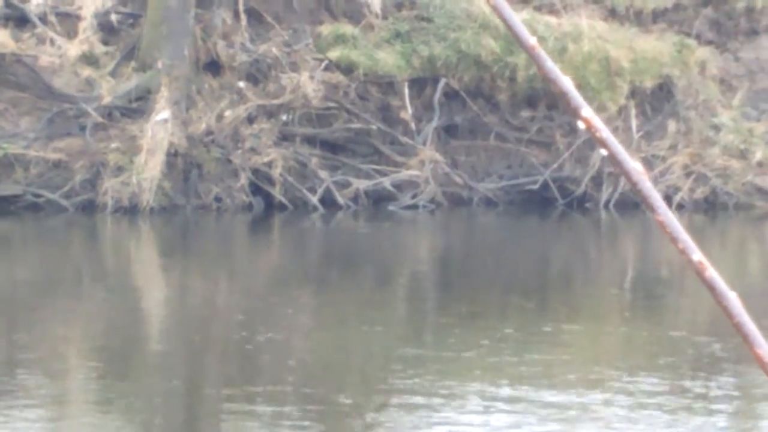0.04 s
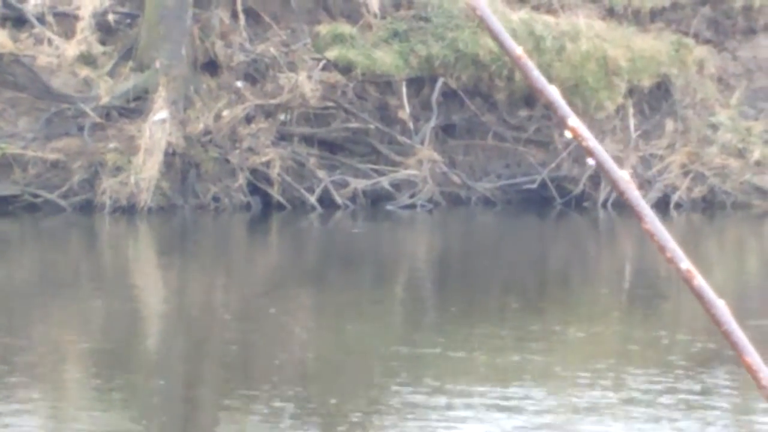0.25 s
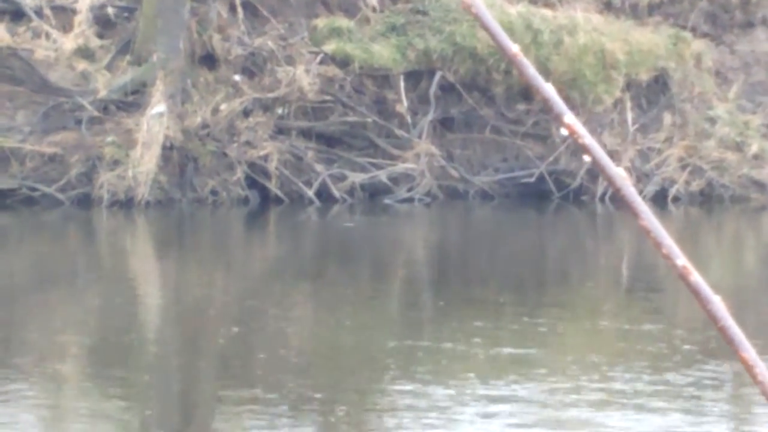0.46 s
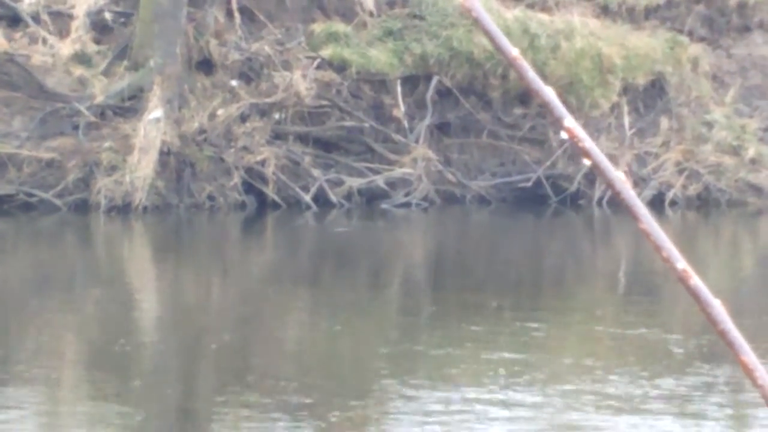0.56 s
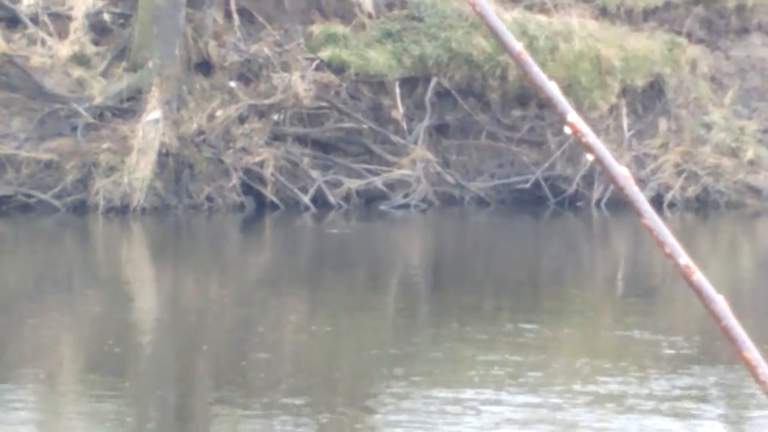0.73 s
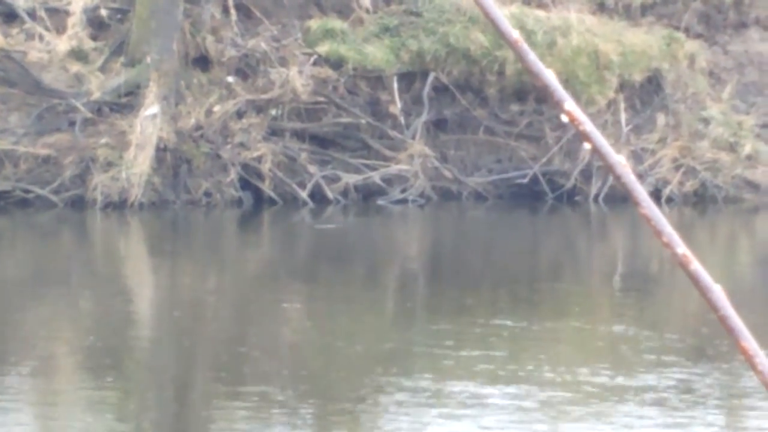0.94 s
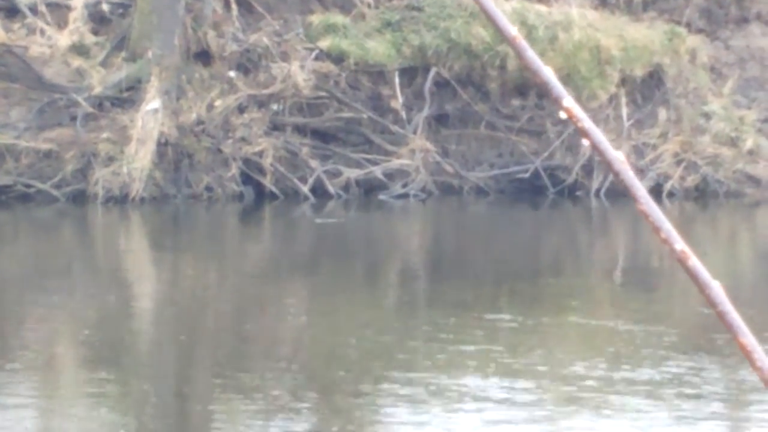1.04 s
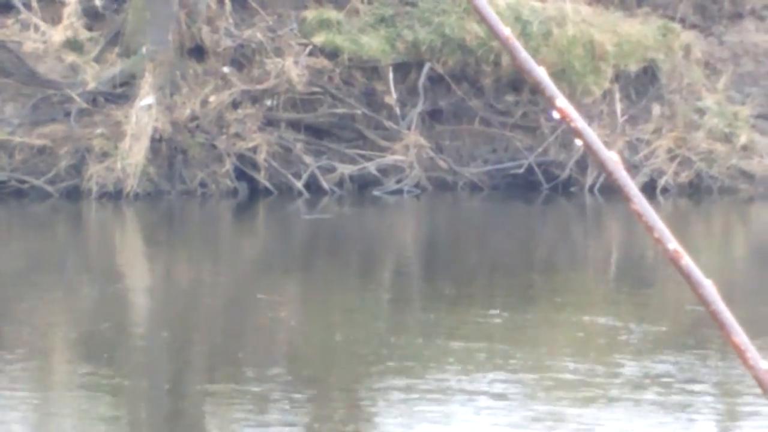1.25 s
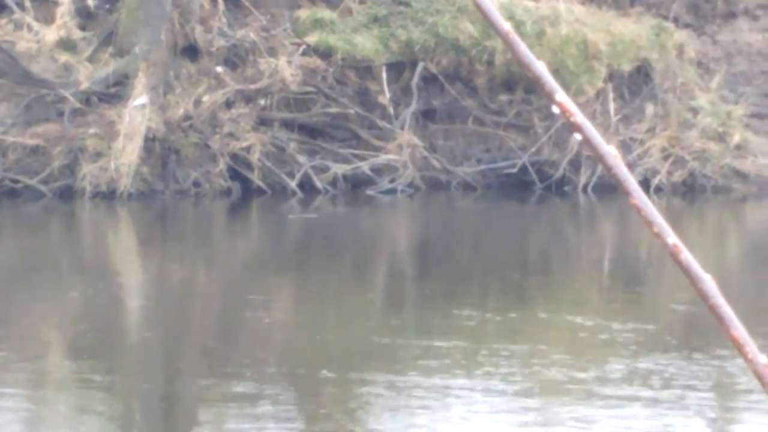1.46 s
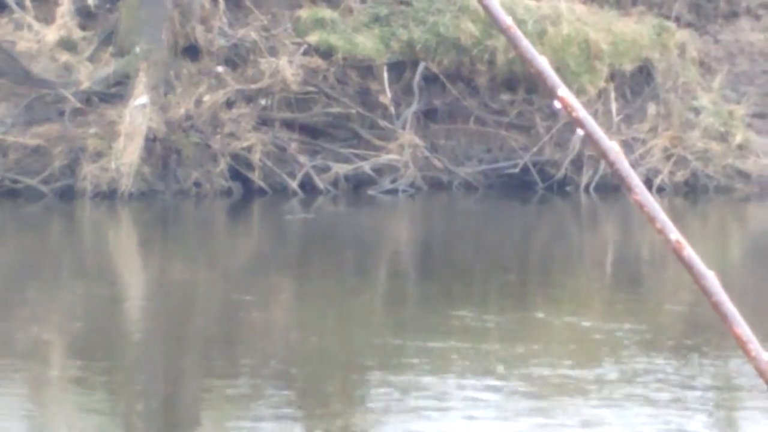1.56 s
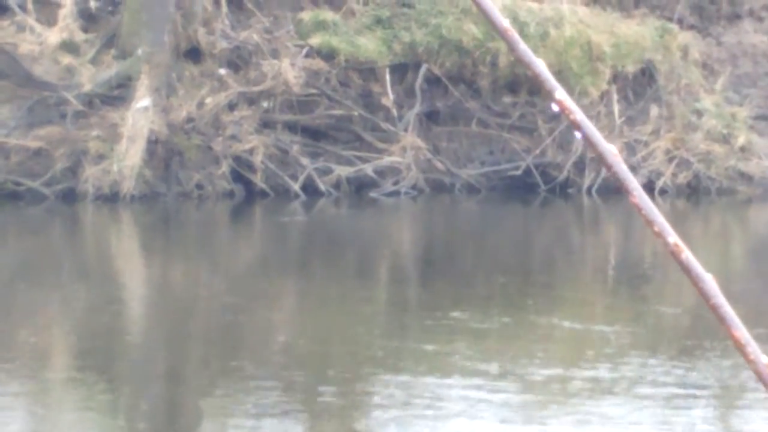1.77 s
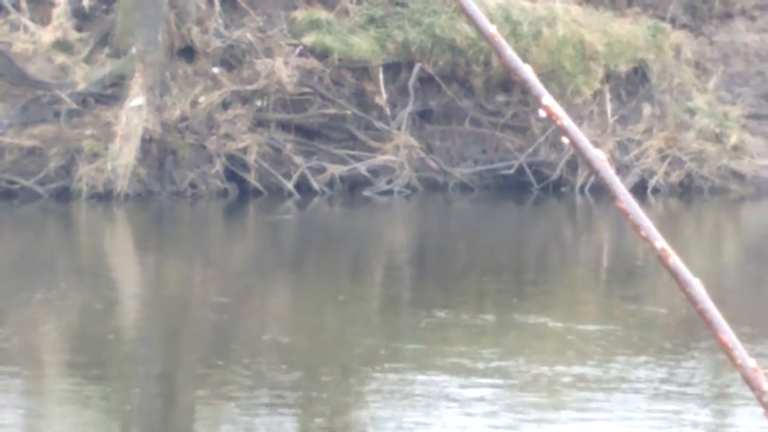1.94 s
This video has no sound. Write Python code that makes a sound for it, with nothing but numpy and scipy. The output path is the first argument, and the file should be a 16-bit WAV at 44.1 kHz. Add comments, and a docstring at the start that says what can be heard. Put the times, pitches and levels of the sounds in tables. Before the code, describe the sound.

Low wind gusts buffet the microphone, with faint high bird chirps over softly washing water.

```python
"""Small birds call across a calm river: five quick falling chirps, a few slurs, and thin high notes
from farther off, each a pure gliding whistle that scatters faintly off the bank and trees.
A few dry ticks sound close by, and gusts buffet the microphone with a low rumble.
Under it all lie a soft, steady wash of water and open air, and the recorder's hiss."""
import sys
import numpy as np
from scipy import signal
from scipy.fft import rfft, irfft
from scipy.io import wavfile
from scipy.ndimage import uniform_filter1d

SR = 44100
rng = np.random.default_rng(int(sys.argv[2]) if len(sys.argv) > 2 else 0)


def file_out(sig):
    """Save sig as 16-bit WAV at sys.argv[1]."""
    # one column per channel
    cols = np.atleast_2d(sig).T
    # limit, then scale
    lim = np.clip(cols, -1, 1)
    pcm = np.round(lim * 32767).astype(np.int16)
    wavfile.write(sys.argv[1], SR, pcm)


N = 88200
T = np.arange(N) / SR
BIN_HZ = np.maximum(np.arange(N // 2 + 1) * SR / N, 1)


def amp(db):
    return 10 ** (np.asarray(db) / 20)


def unit(x):
    return x / np.sqrt(np.mean(x ** 2))


def noise(spectrum):
    """Noise of rms 1, coloured by a curve of (Hz, dB) points."""
    hz, db = np.array(spectrum).T
    gain = amp(np.interp(np.log(BIN_HZ), np.log(hz), db))
    return unit(irfft(rfft(rng.standard_normal(N)) * gain, N))


def band(hz, width_hz):
    """Noise of rms 1 in one steep-sided resonance."""
    detuning = (BIN_HZ ** 2 - hz ** 2) / (BIN_HZ * width_hz)
    return unit(irfft(rfft(rng.standard_normal(N)) / (1 + 1j * detuning) ** 2, N))


def wander(rate_hz):
    """Smooth random drift of rms 1."""
    size = max(int(SR / rate_hz), 2)
    return unit(uniform_filter1d(uniform_filter1d(rng.standard_normal(N), size), size))


# The colour of the river bed. Each row: frequency in Hz, relative level in dB.
RIVER_SPECTRUM = [(30, 4), (150, 0), (300, 2), (500, 0.5), (850, 1), (1200, -3), (1700, -8.5), (2500, -16),
                  (4000, -22), (9000, -52)]

def river():
    """A soft wash of water and open air, with a faint far hum."""
    wash = amp(-59 + .25 * wander(4.4)) * noise(RIVER_SPECTRUM)
    hum = amp(-73.5) * band(hz=471.1, width_hz=16)
    return wash + hum


def turbulence(spectrum, steady_s=.036):
    """Coloured noise held at an even strength, its chance swells ironed out."""
    air = noise(spectrum)
    power = uniform_filter1d(np.abs(signal.hilbert(air)) ** 2, int(steady_s * SR))
    return unit(air / np.sqrt(power))


# The rise and fall of the gusts. Each row: time in seconds, level in dB.
GUST_LEVELS = [(0, -33.5), (.14, -53), (0.219, -36), (0.292, -39), (.35, -49.5), (0.399, -41), (.49, -43),
               (0.599, -46.5), (.73, -35), (.82, -41.5), (0.872, -31), (.96, -25), (1.06, -40), (1.12, -37),
               (1.18, -51.5), (1.288, -36.5), (1.42, -46), (1.54, -39.5), (1.61, -56), (1.74, -47),
               (1.85, -55), (2.0, -51)]
# The colour of their rumble. Each row: frequency in Hz, relative level in dB.
RUMBLE_SPECTRUM = [(20, -26), (32, -20), (46, 7), (65, 7.5), (90, 2), (130, -6), (200, -19.5), (300, -35),
                   (600, -56), (4000, -110)]
# Eddies striking the microphone.
# Each row: peak time in seconds, level in dB, half-width in seconds, pitch in Hz.
EDDIES = [(.226, -37.5, 0.0034, 129), (.265, -46, 0.0045, 140), (0.438, -28, 0.0045, 87.6),
          (0.603, -35, 0.012, 65), (0.666, -37, 0.0082, 72), (0.775, -30.5, 0.0073, 85),
          (.848, -21, 0.0033, 98), (0.871, -30, 0.0071, 174), (0.894, -25.5, 0.0027, 94),
          (0.907, -30, .007, 173), (0.933, -21.5, 0.0069, 79), (0.97, -30.5, 0.029, 52.4),
          (1.038, -31.5, 0.0067, 98), (1.286, -23, 0.0022, 120), (1.349, -25, 0.0054, 110),
          (1.374, -31, 0.0046, 134), (1.391, -27, 0.0079, 97.4), (1.439, -45, 0.0024, 163),
          (1.449, -23, 0.0078, 69.7), (1.501, -31, .008, 110)]
# The fine turbulence inside them. Each row: frequency in Hz, relative level in dB.
EDDY_SPECTRUM = [(60, -29), (130, -0.5), (210, 4.5), (280, -8), (380, -17), (700, -40), (1500, -70),
                 (5000, -88)]

def wind(low_cut_hz=23.8):
    """Gusts rumble on the microphone; each eddy thumps it with a short, rough pressure swing."""
    times, gust_db = np.array(GUST_LEVELS).T
    out = amp(np.interp(T, times, gust_db)) * turbulence(RUMBLE_SPECTRUM)
    grain = amp(-15.5) * turbulence(EDDY_SPECTRUM)
    for peak, db, half_width, hz in EDDIES:
        swing = np.sqrt(2) * np.sin(2 * np.pi * hz * (T - peak) + rng.uniform(0, 2 * np.pi))
        envelope = np.exp(-.5 * ((T - peak) / half_width) ** 2)
        roughness = amp(14 * np.log2(hz / 104))  # higher eddies are rougher, by 14 dB an octave
        out += amp(db) * envelope * (swing + roughness * grain)
    return signal.sosfilt(signal.butter(4, low_cut_hz, "high", fs=SR, output="sos"), out)


# Close, dry ticks. Each row: start in seconds, level in dB, centre in Hz, bandwidth in Hz.
DRY_TICKS = [(0.273, -51.5, 6200, 1500), (0.4742, -51, 6100, 3600), (0.4746, -53.5, 2800, 1300),
             (0.49, -55, 3100, 2600), (0.4969, -51, 6600, 1800), (.508, -60, 6300, 2600),
             (0.5577, -48.5, 11400, 12000), (1.852, -61, 4950, 1400), (1.914, -62, 4600, 1600)]

def ticks(attack_s=.00066, decay_s=.0019):
    """Tiny dry cracks, each a burst of resonant noise over a softer, dull body."""
    out = np.zeros(N)
    for start, db, hz, width_hz in DRY_TICKS:
        age = np.maximum(T - start, 0)
        envelope = np.minimum(age / attack_s, 1) * np.exp(-age / decay_s)
        snap = band(hz, width_hz)
        body = amp(-5) * band(hz=2600, width_hz=1300)
        out += amp(db) * envelope * (snap + body)
    return out


def whistle(contour, start=0, db=0, waver=.0057, flutter_db=2.2, fade_s=.002):
    """One pure, gliding bird note that wavers slightly in pitch and level."""
    times, hz, contour_db = np.array(contour).T
    age = T - start
    pitch = np.interp(age, times, hz) * (1 + waver * wander(258))
    gate = np.clip(np.minimum(age - times[0], times[-1] - age) / fade_s, 0, 1)
    level = amp(db + np.interp(age, times, contour_db) + flutter_db * wander(230))
    return np.sqrt(2) * gate * level * np.sin(2 * np.pi * np.cumsum(pitch) / SR)


# The thin, arched note. Each row: time into the note in seconds, pitch in Hz, relative level in dB.
THIN_CONTOUR = [(0, 6700, -14), (.005, 7100, -4), (.013, 7250, -2), (.025, 7120, 0), (.040, 6880, -10),
                (.065, 6820, -14), (.08, 6750, -22)]
# Its cues. Each row: start in seconds, level in dB.
THIN_CUES = [(0.087, -76), (.280, -72), (0.475, -67), (.653, -65.5), (.846, -73)]
# Falling slurs, one contour apiece. Each row: time in seconds, pitch in Hz, level in dB.
SLUR_CONTOURS = [
    [(.004, 7350, -78), (.020, 6930, -67), (.030, 6700, -65), (.040, 6470, -69), (.046, 6400, -80)],
    [(1.044, 3150, -80), (1.06, 2970, -73), (1.08, 2820, -78)],
    [(1.158, 6500, -81), (1.167, 6400, -70), (1.186, 5930, -68), (1.199, 5380, -65), (1.216, 5270, -65),
     (1.235, 5520, -72), (1.246, 5600, -83)],
    [(1.646, 5050, -79), (1.653, 4850, -64), (1.664, 4620, -60), (1.676, 4560, -61), (1.682, 4470, -69),
     (1.692, 4350, -65), (1.709, 3900, -66), (1.730, 3550, -79)],
]
# The falling chirp. Each row: time into the note in seconds, pitch in Hz, relative level in dB.
CHIRP_CONTOUR = [(0, 5870, -18), (.005, 5830, -8), (.013, 5350, -5.5), (.021, 4750, 0), (.030, 4260, -5),
                 (.039, 3920, -11), (.046, 3830, -23)]
# Its cues. Each row: start in seconds, level in dB.
CHIRP_CUES = [(0.1944, -61), (0.386, -61.5), (0.58, -59), (0.764, -61), (.9495, -60.5)]

def birds(scatter_db=-16, t60_s=.38):
    """Whistled chirps, slurs and thin notes, with a faint tail scattered by the bank and trees."""
    chirps = sum(whistle(CHIRP_CONTOUR, start, db) for start, db in CHIRP_CUES)
    slurs = sum(whistle(contour) for contour in SLUR_CONTOURS)
    thin_notes = sum(whistle(THIN_CONTOUR, start, db) for start, db in THIN_CUES)
    song = chirps + slurs + thin_notes
    tail = rng.standard_normal(N) * amp(-60 * T / t60_s)
    scatter = signal.fftconvolve(song, tail / np.linalg.norm(tail))[:N]
    return song + amp(scatter_db) * scatter


def scene():
    """The riverside, mixed in mono."""
    return (wind() + river() + birds() + ticks())[None]


# The nearly white hiss. Each row: frequency in Hz, relative level in dB.
HISS_SPECTRUM = [(100, -0.33), (3000, -1.7), (5500, 1), (8000, 0.093), (15000, -0.42), (20000, 1)]

def record(dry, hiss_db=-66.5, top_hz=15800):
    """The recorder adds its hiss and cuts the top."""
    high_cut = signal.ellip(12, .1, 80, top_hz, fs=SR, output="sos")
    return signal.sosfilt(high_cut, dry + amp(hiss_db) * noise(HISS_SPECTRUM))


dry = scene()
out = record(dry)
file_out(out)
```